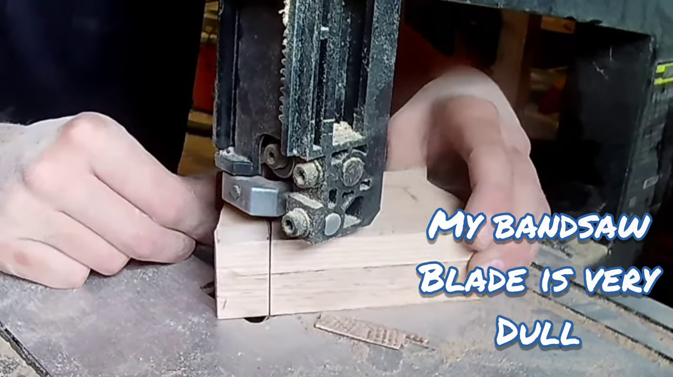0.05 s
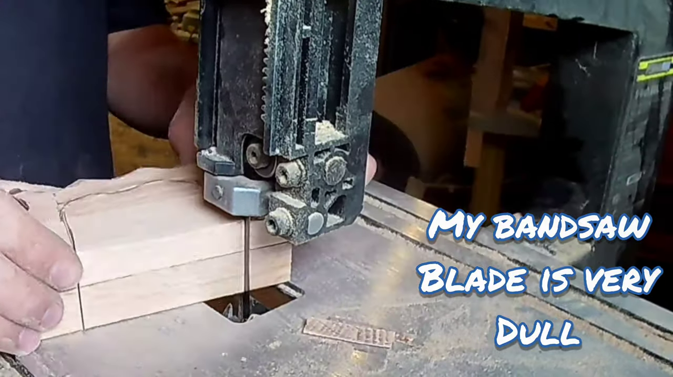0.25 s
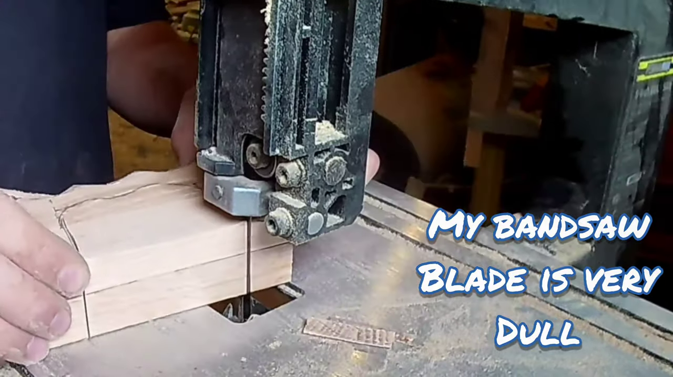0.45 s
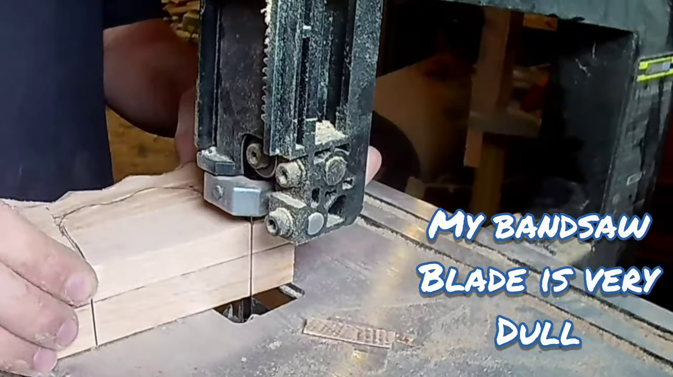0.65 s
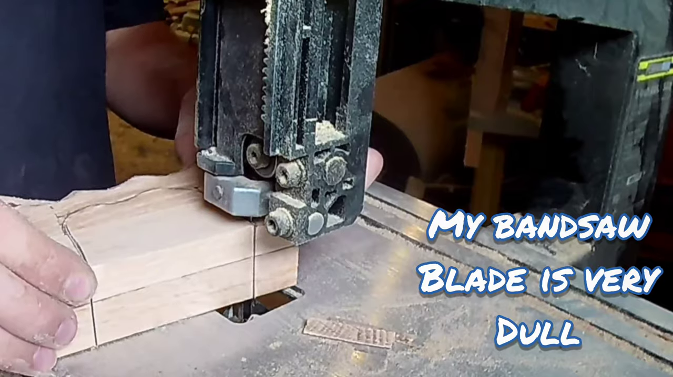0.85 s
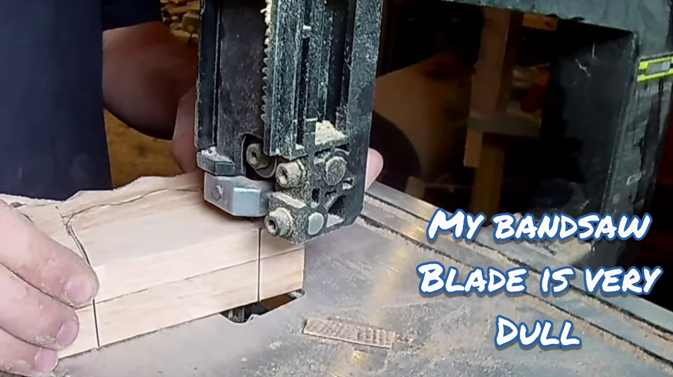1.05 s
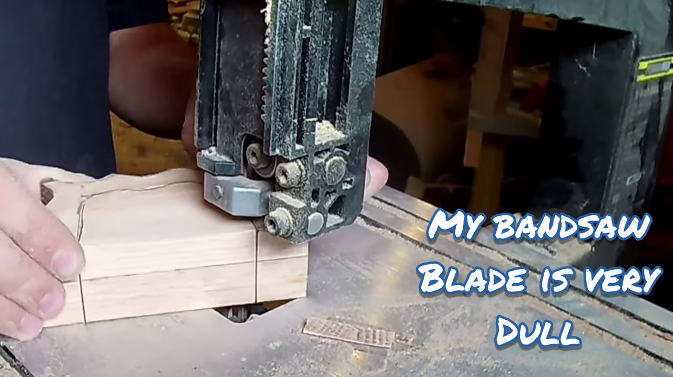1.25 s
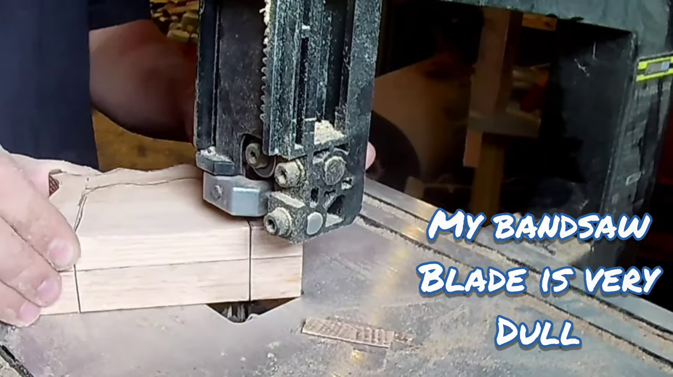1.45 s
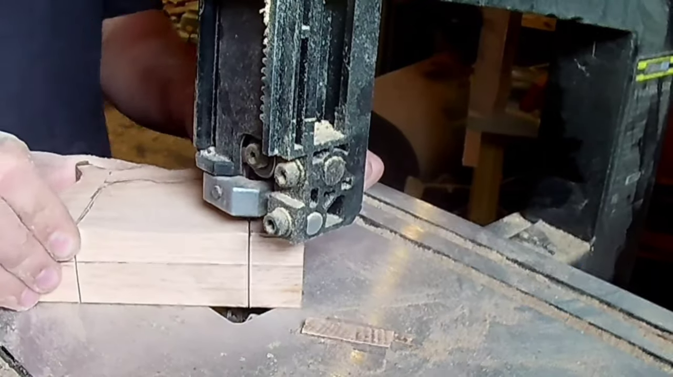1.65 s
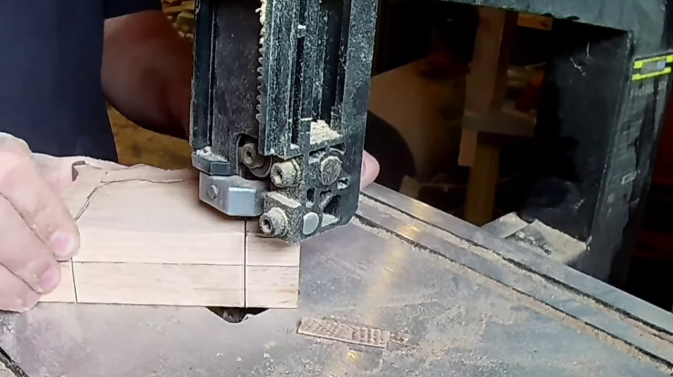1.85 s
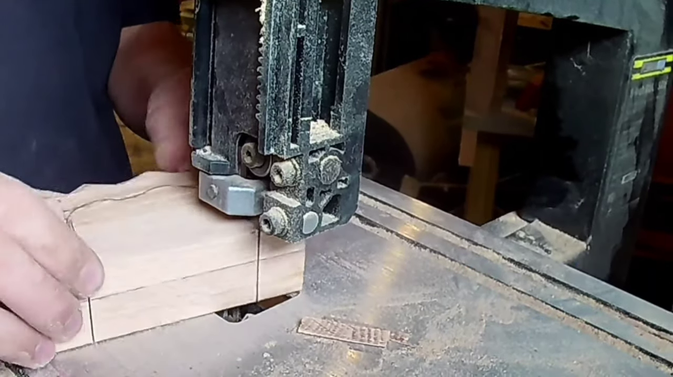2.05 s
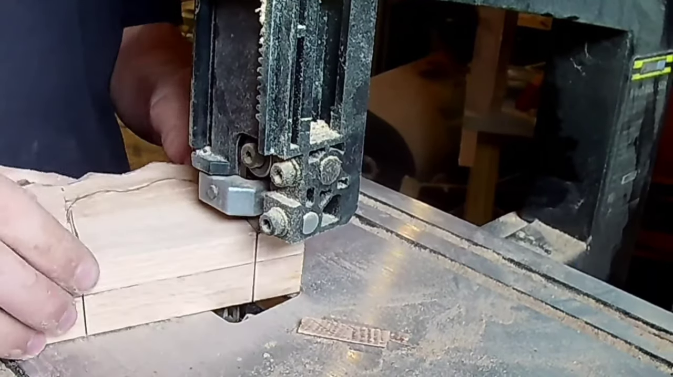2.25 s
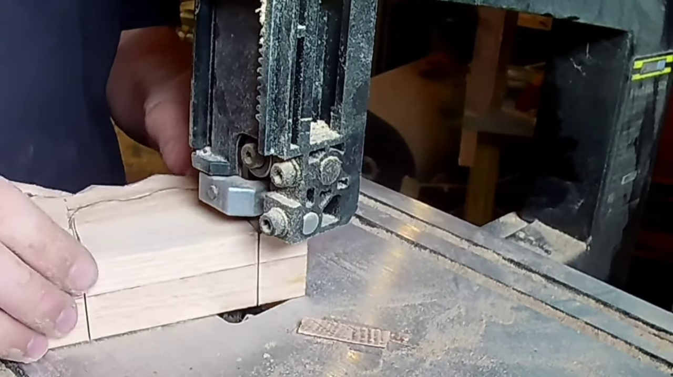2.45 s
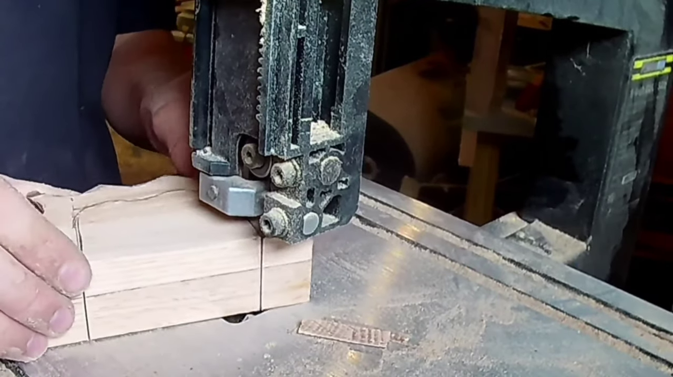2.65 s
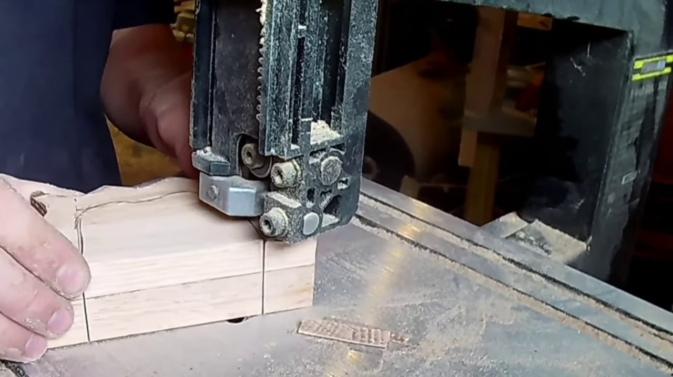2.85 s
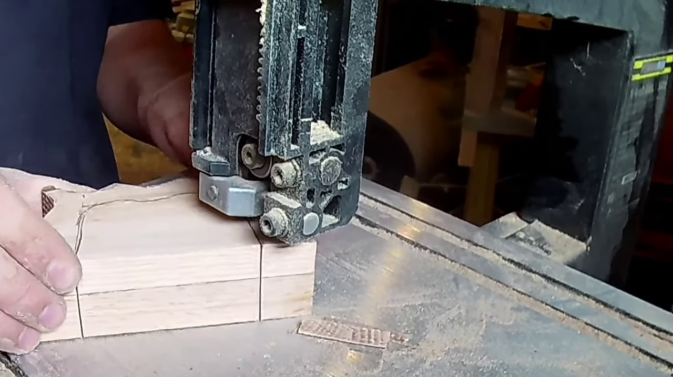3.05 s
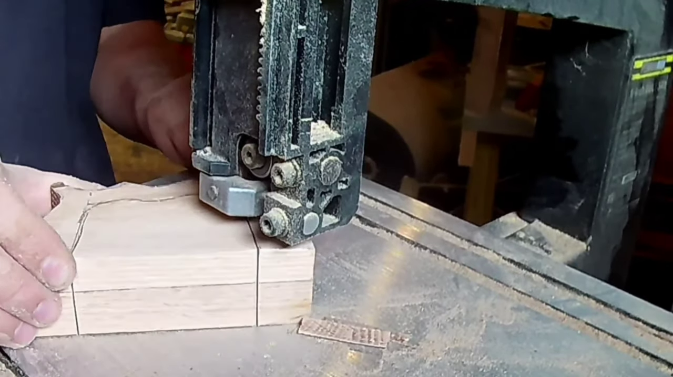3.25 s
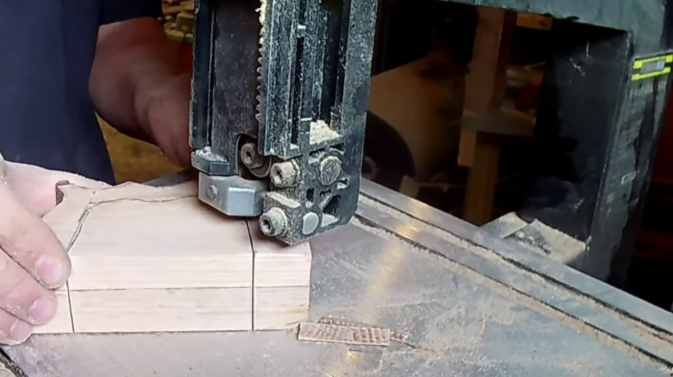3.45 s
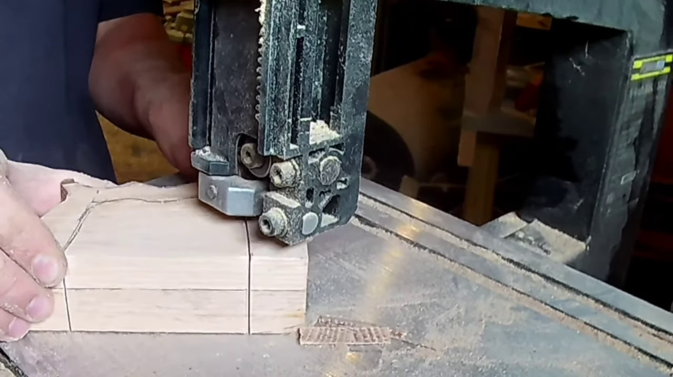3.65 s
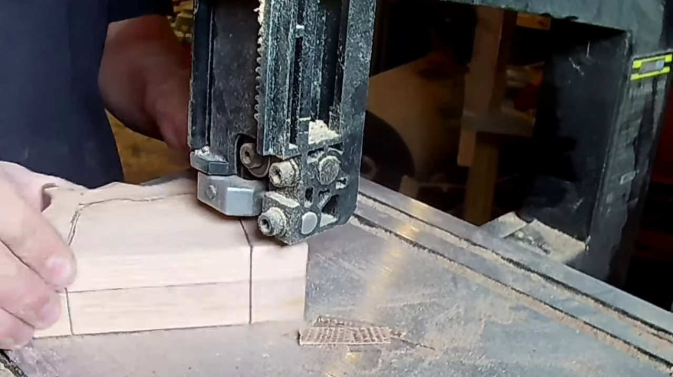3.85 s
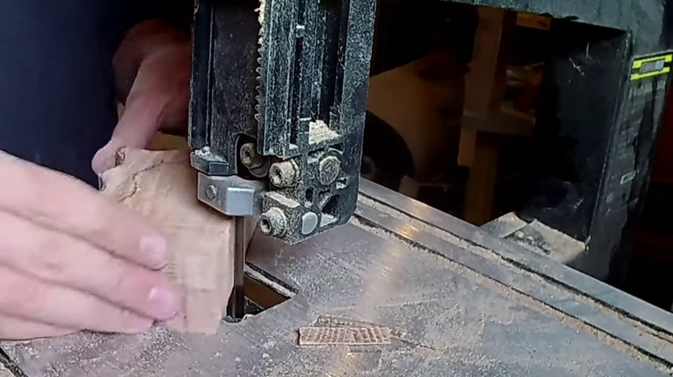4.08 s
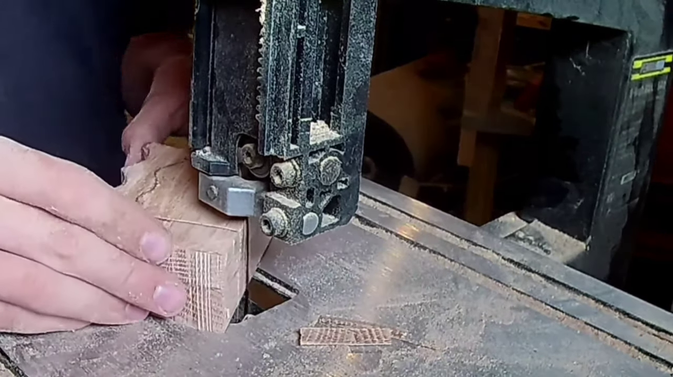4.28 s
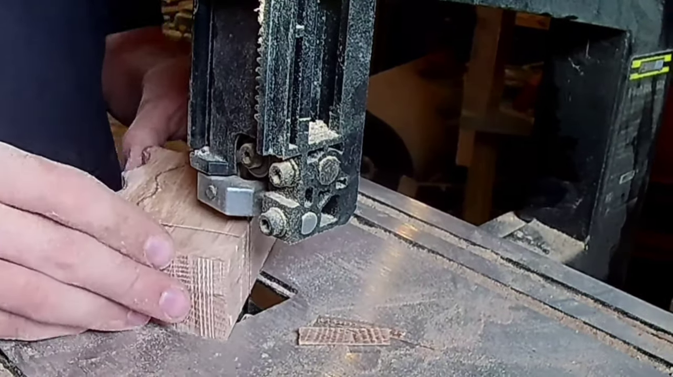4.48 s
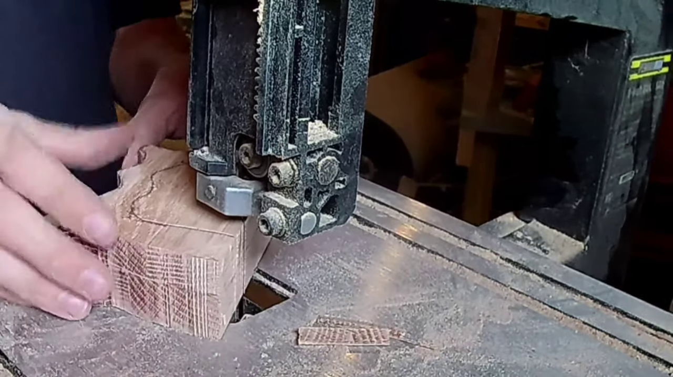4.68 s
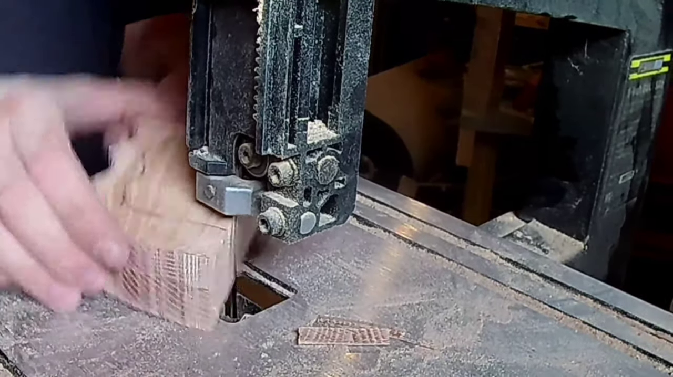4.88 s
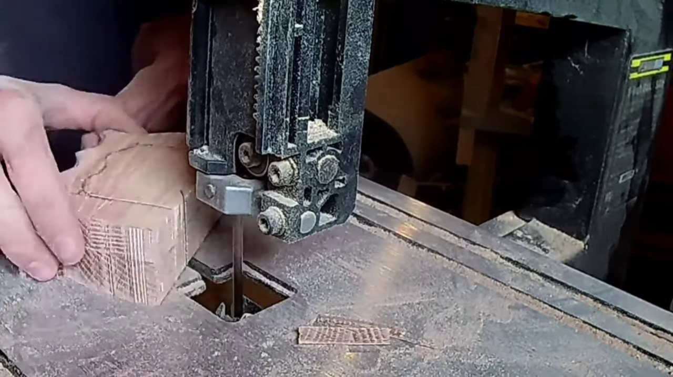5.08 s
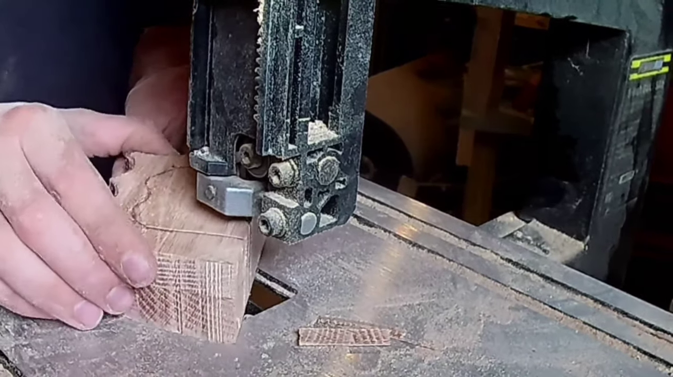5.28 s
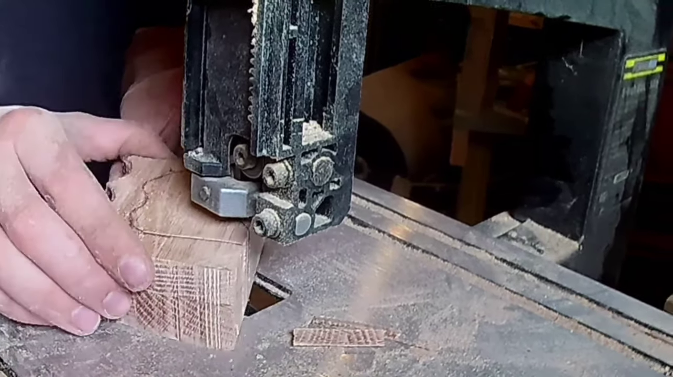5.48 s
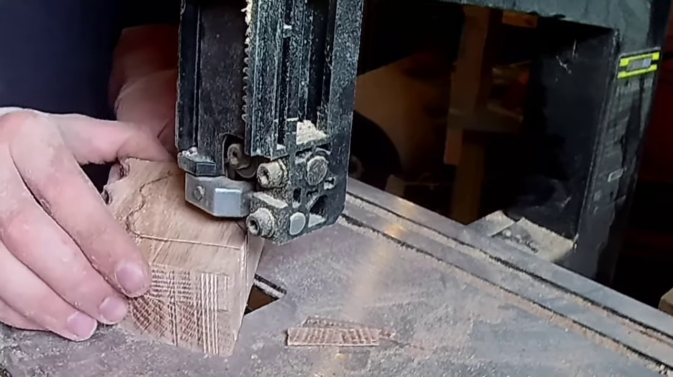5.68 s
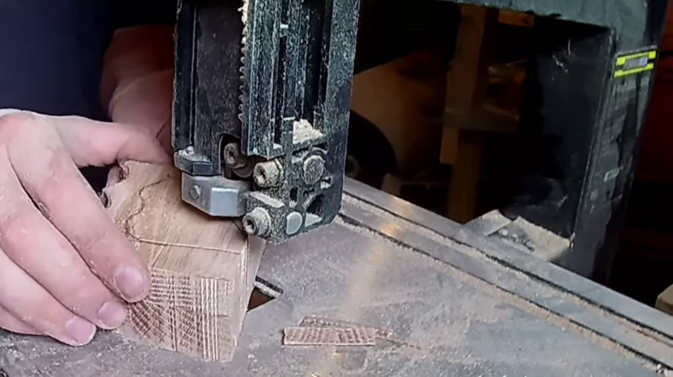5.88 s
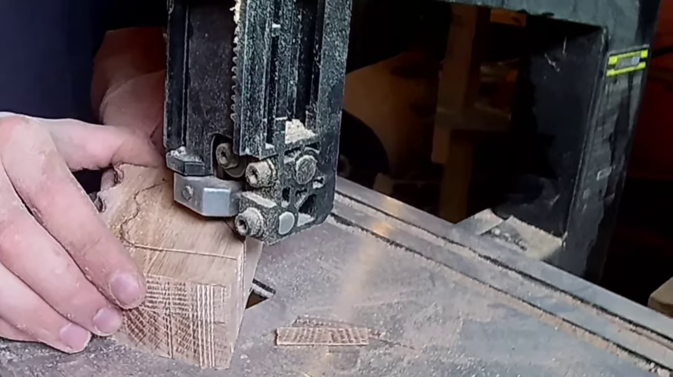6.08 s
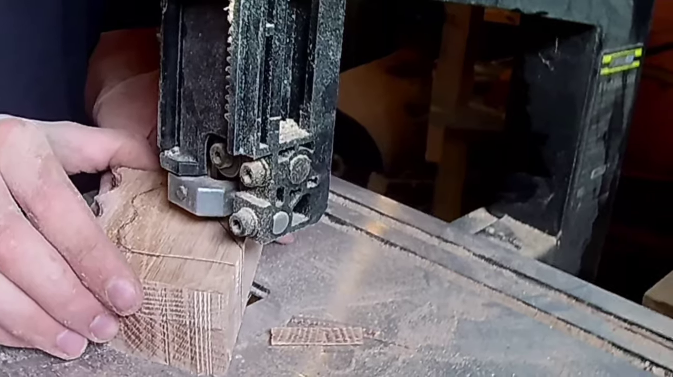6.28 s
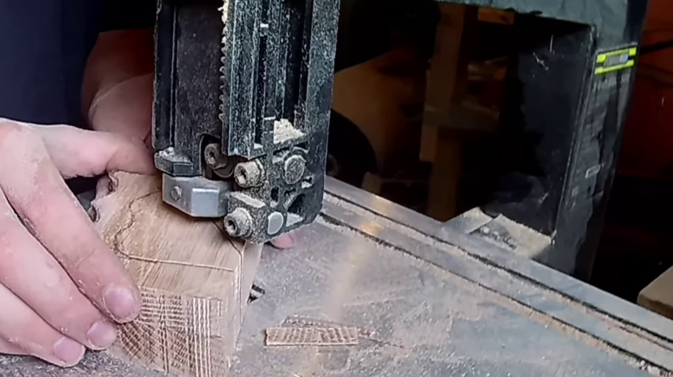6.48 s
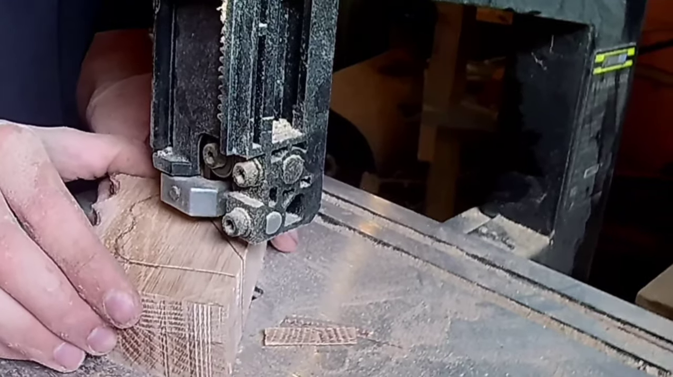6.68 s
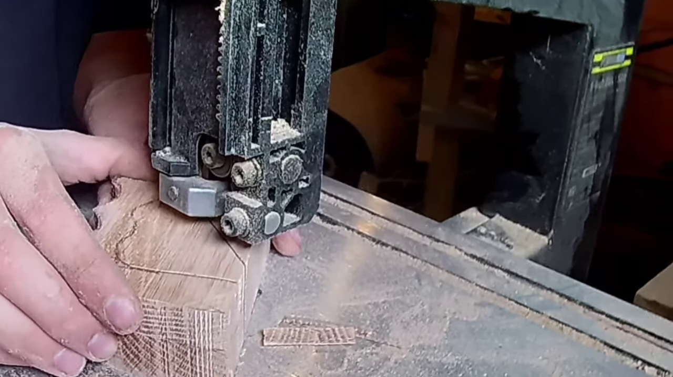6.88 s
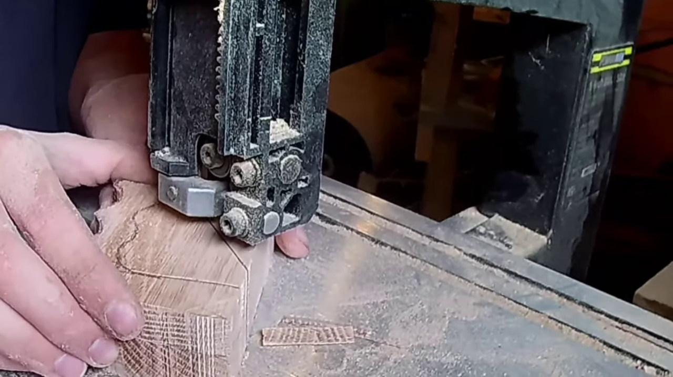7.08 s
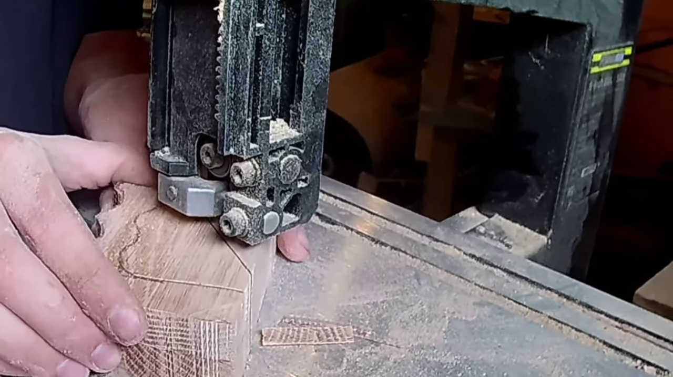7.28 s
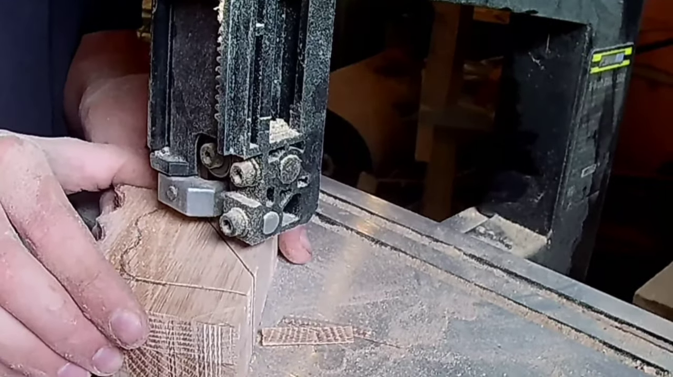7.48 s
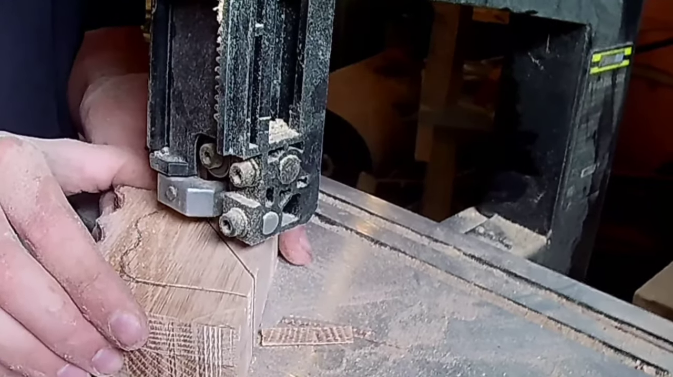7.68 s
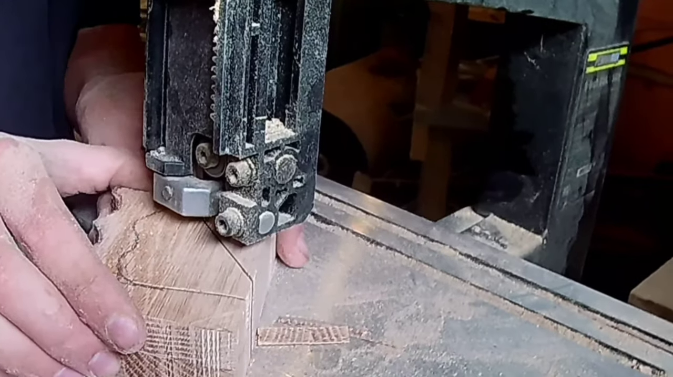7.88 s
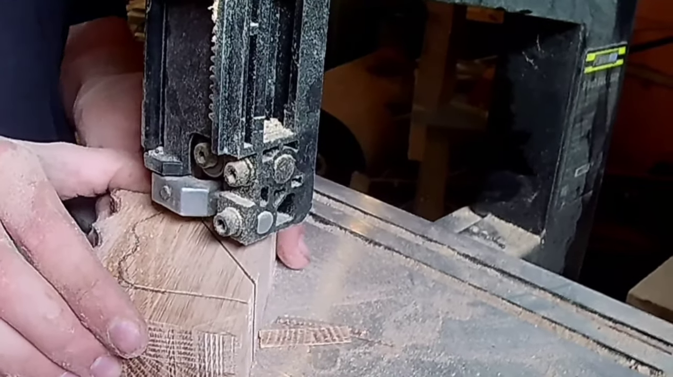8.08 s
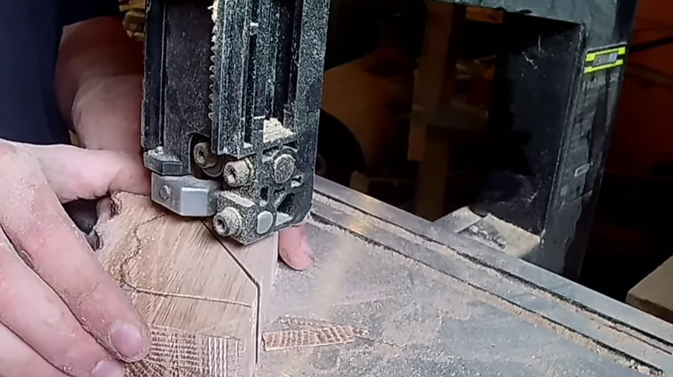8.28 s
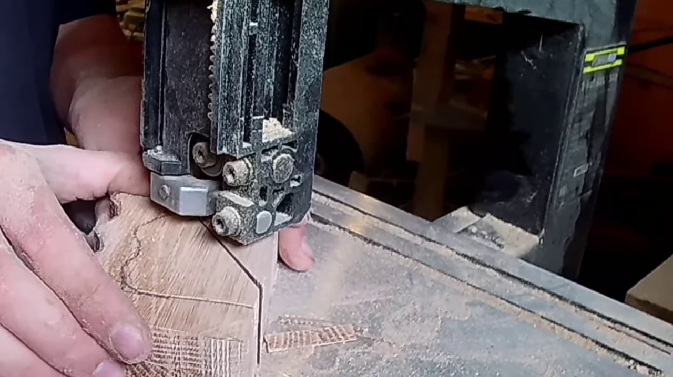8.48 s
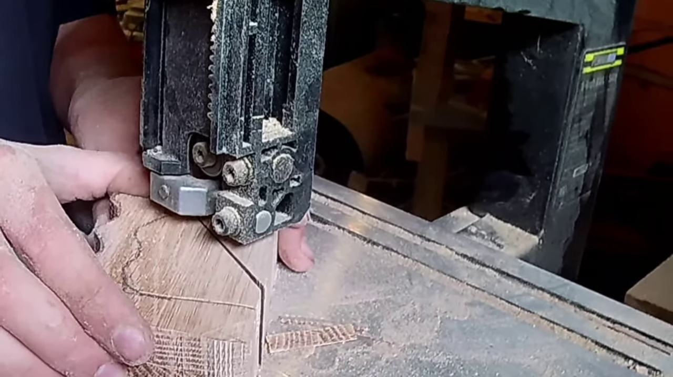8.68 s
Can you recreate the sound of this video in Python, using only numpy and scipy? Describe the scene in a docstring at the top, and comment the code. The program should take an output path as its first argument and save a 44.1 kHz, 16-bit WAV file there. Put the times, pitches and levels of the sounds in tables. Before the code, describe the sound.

A close microphone in a room hears a benchtop bandsaw already cutting hardwood: a high, fuzzy whine around 3.4 kHz with overtones, fluttering rapidly, over gritty rasp, motor hum and a ringing table. Knocks sound at the start, near 0.26 and from 1.2 to 1.5 seconds. At about 1.65 the whine flares and plunges, stuttering near 1.95, then climbs back by 2.3. A steady singing cut follows, with woody howls around 3 to 3.5. Near 3.9 a knock and scraping mark the blank being turned; cutting resumes at 4.15, then the whine slides down from 4.4 to a stop by 4.9. Thuds, clacks and a shuddering scrape fill the near-quiet until 5.2, when the whine snaps back. A heavier, louder cut drags it lower, with deepening drone, howls and slaps between 5.7 and 6.5. The pitch sags again near 7.6 and wavers, still cutting, to 8.7.

```python
"""Dull bandsaw in hardwood

In a room, one microphone stands close to a benchtop bandsaw whose dull blade works through a hardwood blank.
The whine is a stack of partials at the tooth rate; noise through blade and wood resonances makes the rasp.
The motor hums, the stand rumbles and the saw table rings, all following the blade's speed.
Twice the whine sinks as the blade slows, the second time to a stop. The blank knocks and scrapes on the
table as it is turned, then a heavier cut drags the whine down, with slaps and howls from the blank."""
import sys
import numpy as np
from scipy import signal
from scipy.fft import rfft, irfft, next_fast_len
from scipy.io import wavfile
from scipy.ndimage import uniform_filter1d

SR = 44100
rng = np.random.default_rng(int(sys.argv[2]) if len(sys.argv) > 2 else 0)


def log_audio(samples):
    """Write samples as a 16-bit WAV file to the path given in sys.argv[1]."""
    # one column per channel
    frames = np.atleast_2d(samples).T
    # limit to full scale, then quantise
    limited = np.clip(frames, -1, 1)
    pcm = np.round(limited * 32767).astype(np.int16)
    wavfile.write(sys.argv[1], SR, pcm)


N = 384993
TIME = np.arange(N) / SR
SIZE = next_fast_len(N, True)
FREQ = np.fft.rfftfreq(SIZE, 1 / SR)


def amp(db):
    """Decibels to gain."""
    return 10 ** (np.asarray(db) / 20)


def unit(x):
    """Scales to rms 1."""
    return x / np.sqrt(np.mean(abs(x) ** 2) + 1e-20)


def response(points, hz=FREQ):
    """Gain of a spectrum table at the given frequencies, straight in dB over log frequency."""
    point_hz, level_db = np.transpose(points)
    return amp(np.interp(np.log(hz + 1), np.log(point_hz), level_db))


def bell(hz, width_hz):
    """Power shape of one resonance."""
    return 1 / (1 + (2 * (FREQ - hz) / width_hz) ** 2)


def resonances(modes):
    """Gain of a set of peaks and hollows."""
    return amp(sum(db * bell(hz, width) for hz, width, db in modes))


def filtered(x, gain):
    """Filters by a gain per frequency."""
    return irfft(rfft(x, SIZE) * gain, SIZE)[..., :N]


def colour(x, gain):
    """Filters by a gain per frequency, to rms 1."""
    return unit(filtered(x, gain))


def noise():
    """White noise."""
    return rng.standard_normal(N)


def wander(rate_hz):
    """Slow chance of rms 1, up to about the given rate."""
    return colour(noise(), 1 / (1 + (FREQ / rate_hz) ** 4))


def tone(hz):
    """A sine of rms 1 that follows a pitch curve."""
    return np.sqrt(2) * np.sin(2 * np.pi * np.cumsum(hz) / SR)


def held(start, end, rise_s, t60):
    """An envelope that rises, holds and dies away."""
    return np.clip((TIME - start) / rise_s, 0, 1) * amp(-60 * np.clip((TIME - end) / t60, 0, 2))


def add(mix, s, sound):
    """Adds a sound at its time."""
    part = mix[max(round(s * SR), 0):][:len(sound)]
    part += sound[:len(part)]


# blade speed in six stretches: time_s, teeth_per_second_hz
FIRST_CUT = [(0.0, 3455), (0.182, 3275), (0.298, 3453), (1.074, 3398), (1.256, 3503), (1.426, 3340),
             (1.518, 3502), (1.6, 3456)]
NEAR_STALL = [(1.66, 3270), (1.83, 2763), (1.872, 2350), (1.922, 1720), (1.956, 990), (2.01, 1034),
              (2.122, 1370), (2.144, 1362), (2.206, 1682), (2.25, 2082), (2.284, 3074), (2.3, 3410)]
SECOND_CUT = [(2.32, 3514), (2.52, 3448), (2.6, 3422), (3.86, 3338), (4.02, 3625), (4.33, 3441)]
STOP = [(4.37, 3354), (4.39, 3170), (4.466, 3018), (4.528, 2307), (4.674, 1415), (4.702, 1110),
        (4.724, 1016), (4.792, 676.9), (4.85, 361)]
STANDSTILL = [(4.92, 100), (5.19, 100)]  # the curve rests on a low floor
HEAVY_CUT = [(5.21, 3525), (5.53, 3133), (5.93, 3194), (7.05, 3060), (7.52, 2790), (7.55, 2540),
             (7.61, 2523), (7.71, 3164), (7.75, 3282), (7.96, 2976), (8.07, 3165), (8.35, 2706),
             (8.49, 3253), (8.73, 3302)]
REFERENCE_SPEED_HZ = 3730  # teeth per second at which the bite has its full strength


def blade_speed():
    """Teeth per second over time: it sets the whine's pitch and paces the machine."""
    time_s, teeth_hz = np.transpose(FIRST_CUT + NEAR_STALL + SECOND_CUT + STOP + STANDSTILL + HEAVY_CUT)
    return np.interp(TIME, time_s, teeth_hz)


BIND_S, BIND_RISE_S = 5.35, 0.22


def binding():
    """The blade starts to bind in the deep kerf: a rise from 0 to 1."""
    return np.clip((TIME - BIND_S) / BIND_RISE_S, 0, 1)


# the blade is in the kerf: start_s, end_s, rubbing_db, whine_db
CUTS = [(0, 3.97, -81, -61.5), (4.15, 4.8, -80.5, -61.5), (5.206, 8.73, -74, -60.5)]
ENTER_S, LEAVE_T60 = 0.015, 0.2  # rise and decay of each cut, in seconds
# the hands feed the blank into the teeth: start_s, end_s, rise_s, bite_db, singing_over_rasp_db
PUSHES = [(0, 1.6, 0.0067, -72, 5), (.1, .19, 0.081, -67, 14), (1.63, 1.886, 0.062, -68.5, 0),
          (2.465, 2.765, 0.042, -67.5, 8), (2.75, 3.54, 0.16, -66.5, 12), (3.5, 3.97, 0.18, -70.5, 14),
          (4.17, 4.58, 0.18, -64, 9), (5.359, 6.75, 0.068, -65, 11), (6.72, 7.68, 0.12, -67, 11),
          (7.75, 8.57, 0.046, -68, 12)]
EASE_T60 = 0.27  # seconds; the bite dies away after a push
RUB_SING_DB = 9.5  # singing of a lightly rubbing blade against its rasp


def bite(speed_power=0.62):
    """Strength of the rasp and of the blade's singing: rubbing plus pushes, weaker as the blade slows."""
    parts = [(amp(db) * held(start, end, ENTER_S, LEAVE_T60), RUB_SING_DB) for start, end, db, _ in CUTS]
    parts += [(amp(db) * held(start, end, rise, EASE_T60), sing_db)
              for start, end, rise, db, sing_db in PUSHES]
    pace = (blade_speed() / REFERENCE_SPEED_HZ) ** speed_power
    biting = np.sqrt(sum(part ** 2 for part, _ in parts))
    singing = np.sqrt(sum((part * amp(sing_db)) ** 2 for part, sing_db in parts))
    return pace * biting, pace * singing


# how well the blade gives off a partial of the whine: partial_hz, level_db
WHINE = [(300, -5), (560, 7), (850, -16), (1100, -2), (1500, -4.5), (2100, -3), (2550, -9.5), (2850, -7.5),
         (3100, -2), (3400, 3), (3750, 1), (4300, 2.5), (5000, -7.5), (6200, -4.5), (6900, -13.5),
         (7700, -17), (8700, -14), (10400, -20.5), (14000, -41.5)]
# strength of the whine's first five partials: level_db
PARTIALS_DB = [0, -6, -14.5, -19.5, -23]
# the blade catches and its whine flares, or it lets go and the whine sinks: middle_s, length_s, change_db
SQUEALS = [(.07, 0.13, 12.5), (.24, 0.36, -1.5), (0.56, 0.068, 4), (1.1, 0.23, 8), (1.639, 0.26, 7.5),
           (1.914, 0.059, 14), (2.034, 0.22, 11), (2.213, 0.035, 14.5), (2.382, .2, -13), (2.593, .2, 10),
           (3.3, 1.33, 4.5), (3.86, .2, 6), (4.292, 0.25, 12.5), (4.551, 0.1, 22), (4.627, 0.098, 12.5),
           (4.77, .1, -11), (4.807, .05, 11.5), (8.576, .3, 4)]
RECOVER_HZ_PER_S = 5600  # a brisk recovery of blade speed


def whine(flutter, jitter_hz=11, load_jitter_hz=22, fuzz=0.87, fuzz_hz=50, slow_fuzz=1.35,
          chatter_db=3.0, drift_db=2.5, drift_hz=12, stutter_db=3, stutter_hz=28, slow_db=-5,
          bright_hz=4500, dull_db=-7, thin_db=-13, buried_db=-4, flutter_share=.7):
    """Teeth strike at the blade's speed; uneven teeth blur each partial, a slow blade stutters and dulls."""
    hz = blade_speed()
    slow = np.clip((2600 - hz) / 1400, 0, 1)
    load = np.clip((3350 - hz) / 600, 0, 1)  # a loaded blade runs unevenly
    uneven_hz = (jitter_hz + load_jitter_hz * load) * wander(127.2)
    phase = 2 * np.pi * np.cumsum(hz + uneven_hz) / SR

    level = sum(amp(db) * held(start, end, ENTER_S, LEAVE_T60) for start, end, _, db in CUTS)
    flare_db = sum(db * np.clip(1 - 2 * abs(TIME - s) / length, 0, 1) for s, length, db in SQUEALS)
    level = level * amp(flare_db + slow * (slow_db + stutter_db * wander(stutter_hz)))

    blurring = fuzz + slow_fuzz * slow
    buried = np.minimum(2 * load, 1) * binding()  # a binding kerf damps the fundamental
    # a blade that is picking up speed only ticks on the tooth tips, so its fundamental thins
    gain_of_speed = uniform_filter1d(np.gradient(hz) * SR, size=1024)
    recovering = load * np.clip(gain_of_speed / RECOVER_HZ_PER_S, 0, 1)
    fundamental_db = thin_db * recovering + buried_db * buried

    out = 0
    for k, partial_db in enumerate(PARTIALS_DB, 1):
        blur = (wander(fuzz_hz) + 1j * wander(fuzz_hz)) / np.sqrt(2)
        blurred = (1 + blurring * blur) / np.hypot(1, blurring)
        dullness = np.minimum(2 * slow, 1) * np.clip(2 * np.log2(k * hz / bright_hz), 0, 1)
        level_db = partial_db + dull_db * dullness + drift_db * wander(drift_hz)
        if k == 1:
            level_db = level_db + fundamental_db
        gain = response(WHINE, k * hz) * amp(level_db)
        out = out + gain * np.sqrt(2) * (blurred * np.exp(1j * k * phase)).real
    return out * level * unit(flutter ** flutter_share * amp(chatter_db * wander(87)))


# narrow resonances of the steel blade guide: pitch_hz, width_hz, peak_db
GUIDE_MODES = [(4120, 90, 3.5), (4350, 100, 4), (5400, 160, 5.5), (6060, 310, 2.5), (6050, 150, 4),
               (6750, 120, 0)]


def housing(x, t60=0.11, wet_db=-6):
    """The guide's resonances and dense short reflections off the table break up the gliding whine."""
    t = np.arange(SR // 5) / SR
    tail = rng.standard_normal(len(t)) * amp(-60 * t / t60) * (t > .002)
    x = filtered(x, resonances(GUIDE_MODES))
    return x + amp(wet_db) * signal.oaconvolve(x, tail / np.linalg.norm(tail))[:N]


# broad colour of the wood: pitch_hz, level_db
WOOD = [(120, 1.5), (220, 11.5), (320, 9.5), (560, 11), (680, 1), (900, -1), (1500, 0.5), (1950, -2.5),
        (2500, -18), (2850, -14), (3500, -35.5), (7000, -70)]
# resonances of the blank: pitch_hz, width_hz, peak_db
BLANK_MODES = [(313, 26, 12.5), (725, 28, 4), (1038, 27, 11.4), (1230, 30, 10), (1454, 98, 10.2),
               (1653, 62, 4.4), (1940, 52, 3.2), (2170, 45, 11), (2450, 58, 7.1)]


def blank_response():
    """The blank colours whatever scrapes or strikes it."""
    return response(WOOD) * resonances(BLANK_MODES)


# spectrum of the teeth's rasp: pitch_hz, level_db
RASP = [(1500, -25.5), (2100, -9.5), (2650, -2.5), (2850, -11), (3050, 5.5), (4400, 2.5), (4750, -5),
        (5250, -0.5), (6300, -6), (6900, -14.5), (7350, -18), (8050, -27.5), (8600, -18.5), (11500, -37),
        (15500, -47.5)]
# resonances of the singing blade: pitch_hz, width_hz, level_db
BLADE_MODES = [(3310, 600, -2.5), (3370, 300, 1.5), (3639, 130, 6)]


def kerf(flutter, chips_per_s=2500, chip_spread_db=3, chip_share=0.6, rasp_db=3.0, wood_db=7.0,
         sing_db=0, grain_db=1.14, grain_hz=12, graze_db=-68.5, idle_sing_db=-76):
    """Tearing fibres and dust excite the steel blade and the wooden blank; the bite varies with the grain."""
    grain = amp(grain_db * wander(grain_hz))
    biting, singing = bite()
    chip_strength = amp(chip_spread_db * np.minimum(rng.exponential(1, N), 4))
    chips = noise() * chip_strength * (rng.random(N) < chips_per_s / SR)
    tearing = (chip_share * unit(chips) + 0.82 * noise()) * flutter
    rasp = amp(rasp_db) * colour(tearing, response(RASP) * resonances(GUIDE_MODES))

    # a free blade sings faintly in its guides
    singing = np.hypot(singing, amp(idle_sing_db) * blade_speed() / REFERENCE_SPEED_HZ)
    modes = sum(amp(db) * bell(hz, width) for hz, width, db in BLADE_MODES)
    modes = modes / (1 + (3020 / (FREQ + 1)) ** 50)  # steep below their band
    sing = amp(sing_db) * colour(noise() * flutter * amp(0.57 * wander(100)), modes)

    wood = colour(tearing * amp(1.66 * wander(28)), blank_response())
    graze = amp(graze_db) * np.clip(blade_speed() / 1200, 0, 1) ** 2  # any moving blade grazes the wood
    wood_level = np.hypot(amp(wood_db) * biting, graze)
    return grain * (biting * rasp + singing * sing + wood_level * wood)


def blank_drone(drone_hz=365, drone_width_hz=150, light_db=-72, bind_db=-59, deepen_db_per_s=2.0):
    """The binding blade bows the blank's low resonance, louder as the kerf deepens."""
    light = amp(light_db) * sum(held(start, end, ENTER_S, LEAVE_T60) for start, end, _, _ in CUTS)
    bound = binding() * amp(bind_db + deepen_db_per_s * (TIME - BIND_S))
    drone = colour(noise() * amp(2 * wander(21)), bell(drone_hz, drone_width_hz) ** 1.06)
    return np.hypot(light, bound) * drone


# the kerf pinches and one resonance of the blank howls: start_s, end_s, pitch_hz, level_db
HOWLS = [(0.073, 0.234, 771, -63.5), (1.642, 1.88, 774, -68), (2.948, 3.4, 1401, -70.5),
         (3.101, 3.5, 590, -62.5), (5.4, 6.08, 1239, -67), (6.445, 6.725, 1230, -65.5),
         (6.645, 7.65, 2453, -72.5), (7.883, 8.42, 1247, -66)]


def howls(pole_width_hz=95):
    """Friction keeps a single resonance ringing for a moment: a tone blurred by low-passed noise."""
    out = np.zeros(N)
    r = np.exp(-np.pi * pole_width_hz / SR)
    for start, end, hz, db in HOWLS:
        t = np.arange(max(round((end - start) * SR), 2)) / SR
        blur = signal.lfilter([1], [1, -2 * r, r * r], rng.standard_normal((2, len(t))))
        ring = unit(((blur[0] + 1j * blur[1]) * np.exp(2j * np.pi * hz * t)).real)
        add(out, start, amp(db) * ring * signal.windows.tukey(len(t), .4))
    return out


# the hardest snags of the teeth: start_s, level_db (before the snag_db trim)
SNAGS = [(5.703, -46), (5.893, -52.5), (6.067, -52), (6.147, -46), (6.345, -44), (6.379, -47), (6.456, -47),
         (6.518, -49)]
# what the blank rings with when it chatters: pitch_hz, level_db, t60_s
CHATTER_MODES = [(328, 3, 0.08), (463, -8, 0.057), (757.5, 5, 0.068), (1000, -18, 0.11)]


def snags(snag_db=-2.0, light_per_s=9, light_db=6, spread_db=2.5):
    """Each snag lifts the blank and lets it slap back; light ones come at random, scaled by the bite."""
    t = np.arange(SR // 5) / SR
    ring = sum(amp(db - 60 * t / t60) * np.sin(2 * np.pi * hz * t) for hz, db, t60 in CHATTER_MODES)
    slaps = bite()[0] * amp(light_db + spread_db * noise()) * (rng.random(N) < light_per_s / SR)
    for s, db in SNAGS:
        add(slaps, s, amp([db + snag_db]))
    return signal.oaconvolve(slaps, ring * (1 - np.exp(-t / 0.0024)))[:N]


# the blank knocks on the table as it is turned and pushed: start_s, table_ring_db, low_thud_db, clack_db
KNOCKS = [(.037, -27, -50, -74), (0.052, -29.5, -60, -76), (0.252, -46, -67, -54), (0.26, -29, -42, -59),
          (1.215, -32, -46, -61), (1.28, -33.5, -65, -79), (1.486, -31.5, -52, -67),
          (3.878, -29, -42.5, -69), (4.961, -49.5, -43, -51.5), (5.048, -51, -63, -63.5),
          (5.098, -34, -45, -52.5), (5.11, -41, -28.5, -55.5), (5.163, -51, -59, -60),
          (5.207, -55, -47, -59)]
# sharp ticks off the teeth: start_s, level_db
TICKS = [(.255, -53), (5.208, -63)]
# spectra of the woody clack and of the tick: pitch_hz, level_db
CLACK = [(300, -21), (1000, -1.5), (2200, -8.5), (4000, 27), (5500, 2), (9000, -14)]
TICK = [(500, -15), (1500, 8), (5000, 4), (7500, -2), (15000, -16)]


def knocks(ring_hz=445, ring_t60=0.081, thud_hz=185, thud_t60=0.14, clack_t60=0.074, tick_t60=0.015):
    """Each knock rings the table, thuds in the frame and clacks in the wood; ticks are brief and bright."""
    t, out = np.arange(SR // 4) / SR, np.zeros(N)
    clack = colour(noise(), blank_response() * response(CLACK))
    tick = colour(noise(), response(TICK))
    soft = 1 - np.exp(-(t / 0.00059) ** 2)  # wood gives a little on contact
    for s, ring_db, thud_db, clack_db in KNOCKS:
        ring = amp(ring_db - 60 * t / ring_t60) * np.sin(2 * np.pi * ring_hz * t) * (1 - np.exp(-t / 0.0043))
        thud = amp(thud_db - 60 * t / thud_t60) * np.sin(2 * np.pi * thud_hz * t) * (1 - np.exp(-t / 0.0012))
        wood = amp(clack_db - 60 * t / clack_t60) * np.roll(clack, rng.integers(N))[:len(t)]
        add(out, s, soft * (ring + thud + wood))
    for s, db in TICKS:
        add(out, s, amp(db - 60 * t / tick_t60) * np.roll(tick, rng.integers(N))[:len(t)])
    return out


# the blank is dragged over the table as it is turned: start_s, end_s, scrape_db, shudder_db
SLIDES = [(4.081, 4.361, -72.5, -54), (4.796, 4.861, -75, -62.5), (5.035, 5.119, -73, -47.5)]
# spectrum of the humming frame, also shaken by the motor: pitch_hz, level_db
HUM = [(50, -15), (85, -7), (112, 2), (135, 1), (175, -2), (240, -14), (400, -31.5), (800, -67)]
TABLE_HZ, TABLE_WIDTH_HZ = 464.3, 89  # the saw table's resonance


def slide(rise_s=0.022, t60=0.23, stick_db=3, table_db=-6):
    """The dragged blank sticks and slips: it scrapes, shudders the frame and rings the table."""
    sticking = noise() * amp(stick_db * wander(90))
    scrape = colour(sticking, blank_response())
    frame = colour(sticking, response(HUM) * bell(150, 160))
    shudder = frame + amp(table_db) * colour(sticking, bell(TABLE_HZ, 110))
    return sum(held(start, end, rise_s, t60) * (amp(scrape_db) * scrape + amp(shudder_db) * shudder)
               for start, end, scrape_db, shudder_db in SLIDES)


# how the machine shakes at each blade speed: teeth_per_second_hz, stand_rumble_db, motor_hum_db, table_ring_db
SHAKE_BY_SPEED = [(100, -74, -59, -71), (1080, -54.5, -51.5, -64), (2050, -59, -50.5, -54.5),
                  (2730, -56.5, -45, -58), (3190, -45, -43, -62), (3280, -48.5, -46, -57.5),
                  (3414, -49, -48, -50.5), (3560, -57.5, -46, -53)]
# spectrum of the stand's rumble: pitch_hz, level_db
RUMBLE = [(8, 3.5), (18, 16.5), (30, 18), (45, 14), (70, 4), (110, -26.5), (300, -52.5)]
# the rumble drops while the blank is turned for a new cut: start_s, end_s
LIFTED_S = (4.0, 4.42)
SHAFT_HZ = 28.7  # mean turns of the motor shaft a second
TEETH_PER_DRIVE_CYCLE = 7.4


def machine(rumble_db=-0.5, shaft_db=-6.5, frame_db=-2.5, mains_db=-3.0, table_db=-4, drive_db=-2,
            strain_db=2.0, strain_bite_db=-68, lifted_db=-5):
    """The motor hums in its frame, the stand rumbles, the drive's tone rings the table; levels follow speed."""
    speed_hz = blade_speed()
    at_hz, *columns = np.transpose(SHAKE_BY_SPEED)
    stand_level_db, hum_level_db, table_level_db = [np.interp(speed_hz, at_hz, c) for c in columns]
    # a hard bite strains the motor
    hum_level_db = hum_level_db + strain_db * (bite()[0] / amp(strain_bite_db) - 1)
    stand_level_db = stand_level_db + lifted_db * held(*LIFTED_S, .1, .5)

    shaft = tone(SHAFT_HZ + 1.473 * wander(7.7))  # imbalance, once a turn
    rumble = amp(rumble_db) * colour(noise(), response(RUMBLE)) + amp(shaft_db) * shaft
    mains = tone(120 + 3 * wander(11.92))
    hum = amp(frame_db) * colour(noise(), response(HUM)) + amp(mains_db) * mains

    drive_hz = speed_hz / TEETH_PER_DRIVE_CYCLE
    # the drive's tone is loudest when it lies on the table's resonance
    tuned = 1 / np.sqrt(1 + ((drive_hz - TABLE_HZ) / 35) ** 2)
    drive = tuned * tone(drive_hz * (1 + 0.009 * wander(25.76)))
    table = colour(noise(), np.sqrt(bell(TABLE_HZ, TABLE_WIDTH_HZ)) * bell(468, 180))
    ring = amp(table_db) * table + amp(drive_db) * drive
    return amp(stand_level_db) * rumble + amp(hum_level_db) * hum + amp(table_level_db) * ring


# spectrum of the room's air: pitch_hz, level_db
ROOM_AIR = [(30, 16.5), (150, 3.5), (700, 4), (3000, -1), (8000, -11), (15000, -20)]


def room_air(level_db=-85):
    """The room's faint steady noise behind the saw."""
    return amp(level_db) * colour(noise(), response(ROOM_AIR))


FLUTTER_HZ = 43.7  # the band's weld passes at about this rate


def scene():
    """The running band flutters in the kerf, shaking whine and rasp together."""
    beat = np.sin(2 * np.pi * np.cumsum(FLUTTER_HZ + 0.57 * wander(6.1)) / SR)
    flutter = unit(amp(1.32 * beat + 1.14 * wander(39)))
    cutting = housing(whine(flutter)) + kerf(flutter)
    blank = blank_drone() + howls() + snags() + knocks() + slide()
    return (cutting + blank + machine() + room_air())[None]


# hollows in the sound that reaches the microphone: pitch_hz, width_hz, depth_db
NULLS = [(2838, 110, -15.5), (7920, 670, -9)]
EDGE_HZ = 15720  # upper band limit


def record(dry):
    """The hollows in the sound at the microphone; then the band limit."""
    heard = filtered(dry, resonances(NULLS))
    low_pass = signal.firwin(511, EDGE_HZ, window=("kaiser", 9), fs=SR)
    return signal.oaconvolve(heard, low_pass[None], "same")


dry = scene()
out = record(dry)
log_audio(out)
```